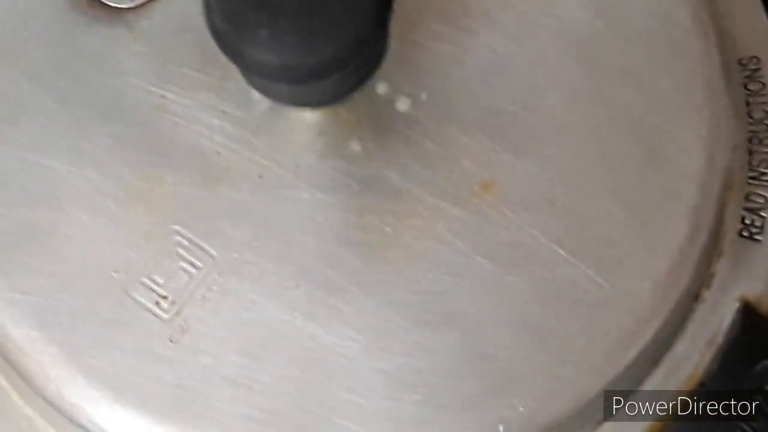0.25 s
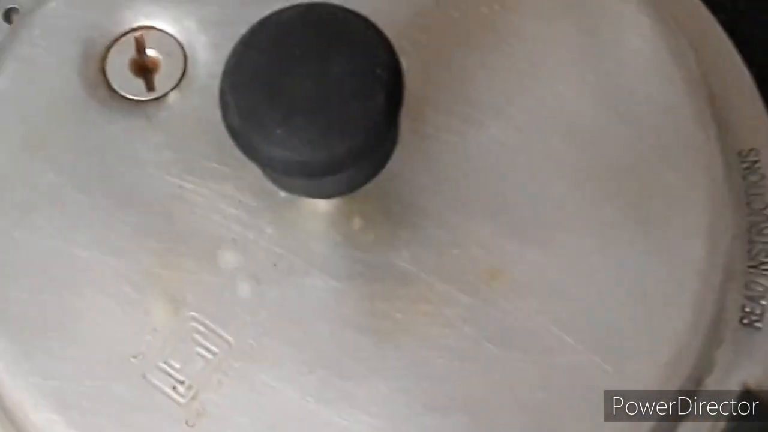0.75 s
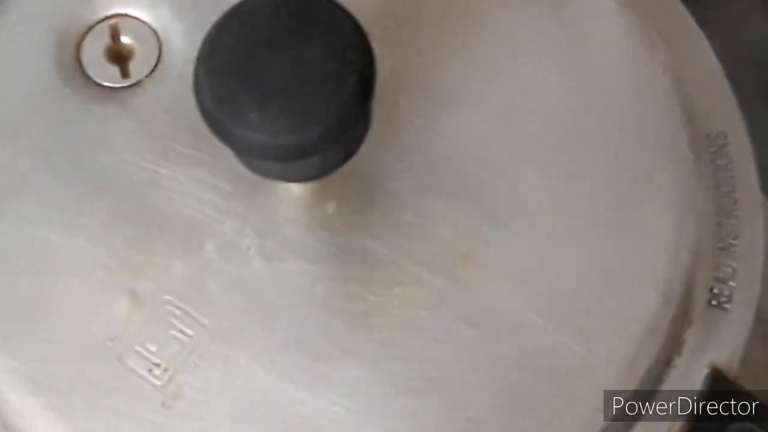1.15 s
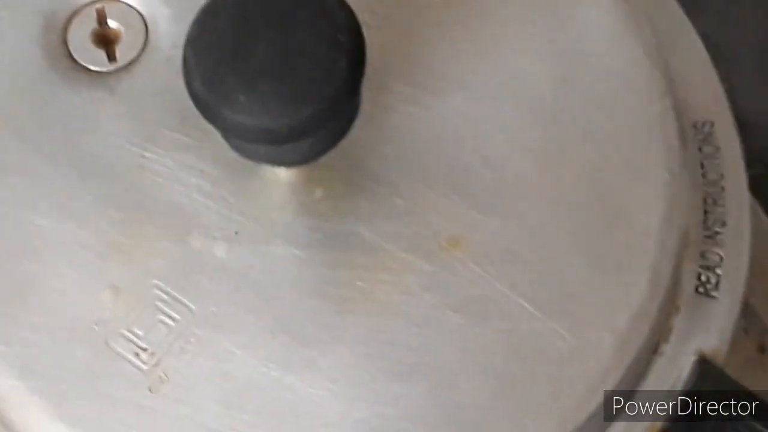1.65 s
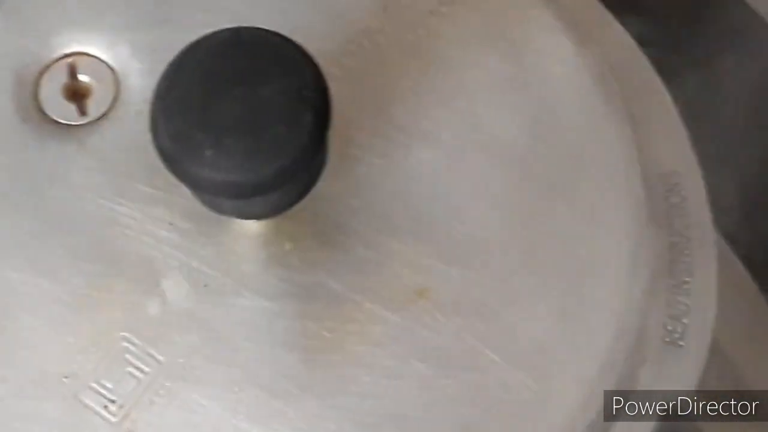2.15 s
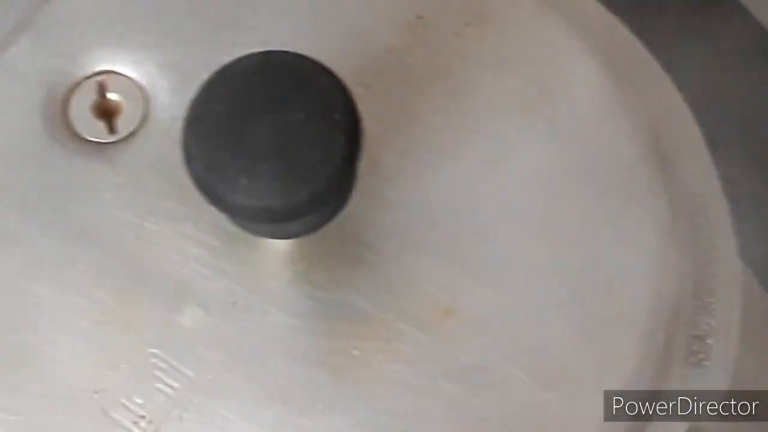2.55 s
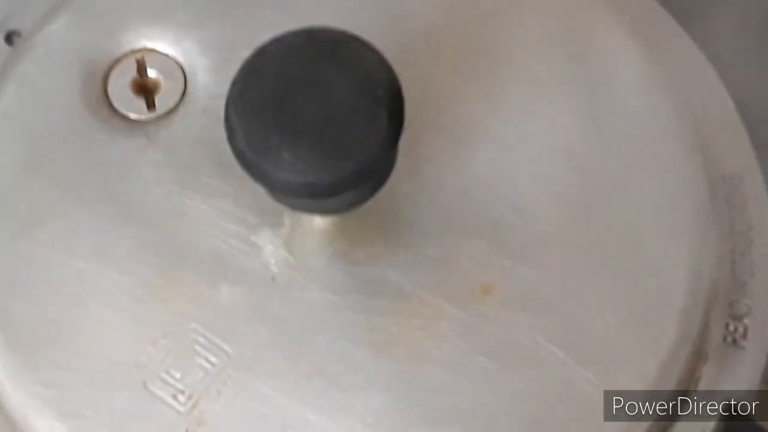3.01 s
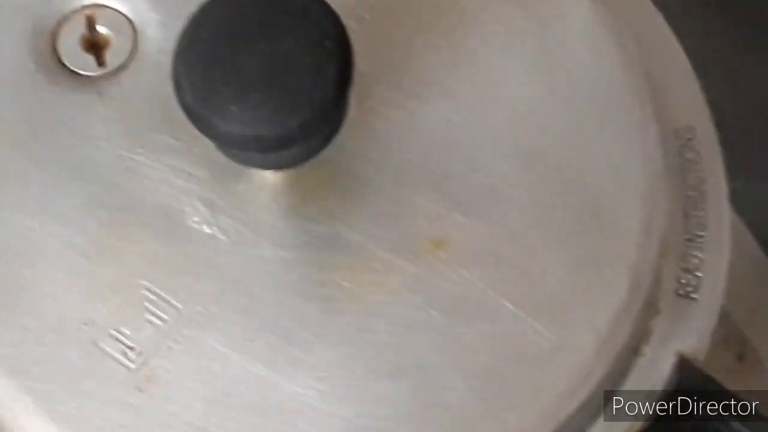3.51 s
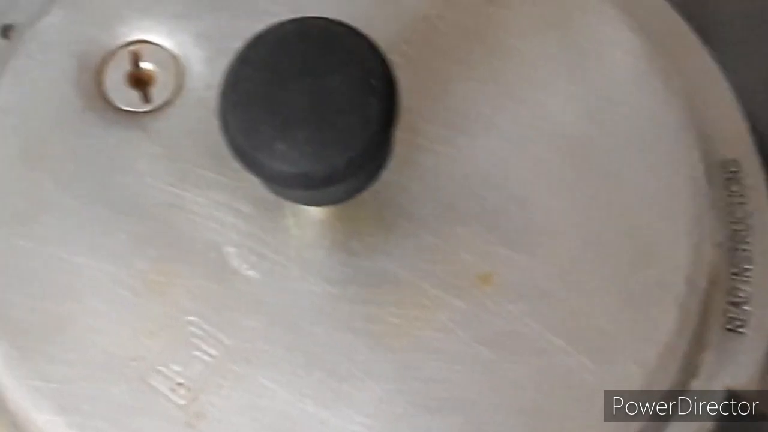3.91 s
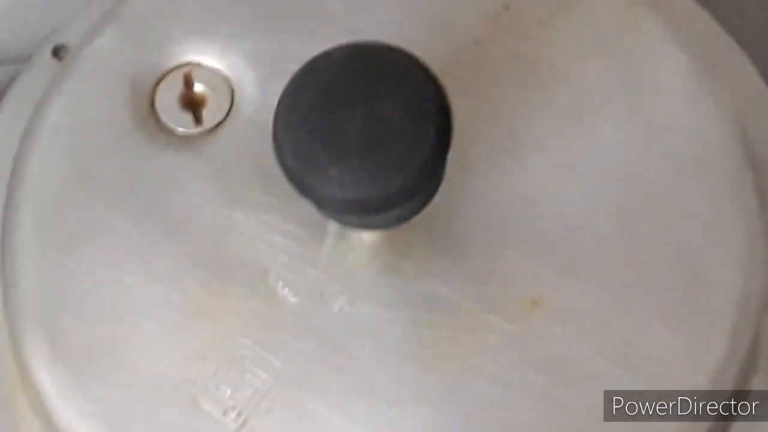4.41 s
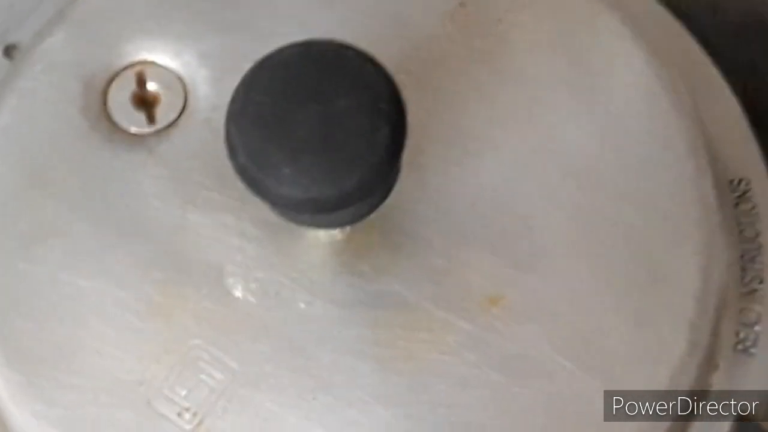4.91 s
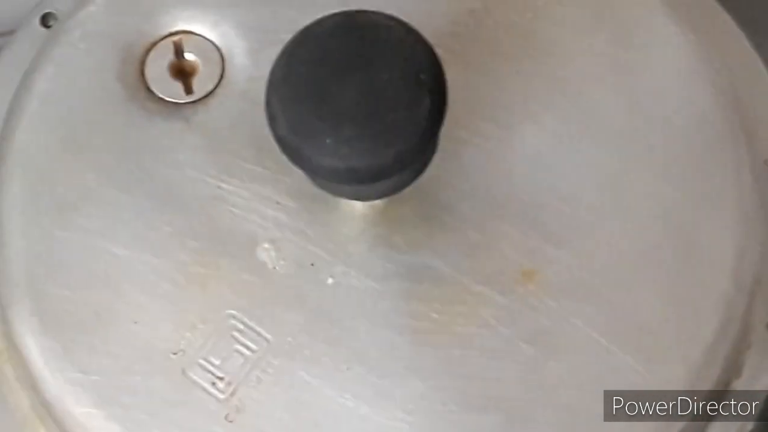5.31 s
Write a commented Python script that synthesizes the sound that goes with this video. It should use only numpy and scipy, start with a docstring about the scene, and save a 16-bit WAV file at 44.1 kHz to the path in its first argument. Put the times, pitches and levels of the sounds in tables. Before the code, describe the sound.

A pressure cooker leaks faintly, clanks, then releases a loud, steady hiss of steam with two brief wet sputters.

```python
"""A faint hiss leaks from a pressure cooker, heard from just above its lid in a kitchen.
The weight valve lifts with a clank, and the jet roars through the resonances of valve and lid,
brightest in its first wet burst. Water sputters in the vent twice, and the jet's level dips briefly
during the second sputter. Dull knocks sound under the jet, and a low hum fills the room."""
import sys
import numpy as np
from scipy import signal
from scipy.fft import rfft, irfft, next_fast_len
from scipy.io import wavfile
from scipy.ndimage import uniform_filter1d, minimum_filter1d

SR = 44100
rng = np.random.default_rng(int(sys.argv[2]) if len(sys.argv) > 2 else 0)


def digitize_waveform(pressure):
    """Quantize a signal to 16-bit integers and store it at the path in sys.argv[1].

    Rows of a 2-D input are taken as channels; values are limited to [-1, 1].
    """
    field = np.atleast_2d(pressure).T
    bounded = np.clip(field, -1, 1)
    quanta = np.round(bounded * 32767).astype(np.int16)
    wavfile.write(sys.argv[1], SR, quanta)


N = 245195
FFT_SIZE = next_fast_len(N, True)
TIME = np.arange(N) / SR
BIN_HZ = np.maximum(np.arange(FFT_SIZE // 2 + 1) * SR / FFT_SIZE, 1)
TOP_HZ = 15500


def undb(db):
    """Decibels to gain."""
    return 10 ** (np.asarray(db) / 20)


def unit_rms(x):
    """The signal scaled to an rms of 1."""
    return x / np.sqrt(np.mean(x ** 2))


def colour(points):
    """EQ curve: gain per bin from (Hz, dB) points joined on a log axis."""
    hz, db = np.transpose(points)
    return undb(np.interp(np.log(BIN_HZ), np.log(hz), db))


def lowpass(hz, order):
    """Low-pass gain per bin."""
    return 1 / np.sqrt(1 + (BIN_HZ / hz) ** (2 * order))


def noise(gain):
    """Noise of rms 1, shaped by a gain per bin."""
    return unit_rms(irfft(rfft(rng.standard_normal(FFT_SIZE)) * gain, FFT_SIZE)[:N])


def band_noise(hz, width_hz):
    """A breathy band of noise around one pitch."""
    return noise(1 / (1 + ((BIN_HZ - hz) / width_hz) ** 2) ** 2)


def wobble(per_s):
    """Smooth random modulation of rms 1."""
    hold = max(int(SR / per_s), 1)
    steps = np.repeat(rng.standard_normal(N)[:N // hold + 1], hold)
    return unit_rms(uniform_filter1d(uniform_filter1d(steps, hold), hold)[:N])


def swell(start, attack, t60):
    """Envelope with a linear attack and an exponential tail."""
    age = TIME - start
    return np.clip(age / attack, 0, 1) * np.exp(-np.log(1000) * np.maximum(age - attack, 0) / t60)


def reflections(share, t60):
    """Echoes from worktop and walls ripple the spectrum of a steady sound: gain per bin."""
    echo = rng.standard_normal(N) * swell(0, 0.0015, t60)
    return np.abs(1 + share * rfft(echo, FFT_SIZE) / np.sqrt(np.sum(echo ** 2)))


def drifting_noise(gain, echo_share, t60, places=6):
    """Noise whose echo ripple shifts slowly as the listening point sways."""
    position, out = np.linspace(0, places - 1, N), 0
    for place in range(places):
        crossfade = np.sqrt(np.maximum(1 - np.abs(position - place), 0))
        out = out + noise(gain * reflections(echo_share, t60)) * crossfade
    return out


# The colour of the room tone. Each row: frequency in Hz, gain in dB.
ROOM_EQ = [(20, -22), (60, -12), (85, -5), (120, 2.5), (220, -7), (400, 0.5), (540, 9.5), (750, 6),
           (1500, 6), (4000, -25)]

def kitchen(air_db=-52, hum_hz=85, hum_db=-70):
    """A bed of soft room tone and a low, wavering hum."""
    hum = np.sin(2 * np.pi * hum_hz * TIME) * undb(hum_db + 2.2 * wobble(5.1))
    return noise(colour(ROOM_EQ)) * undb(air_db + 1.1 * wobble(2)) + hum


# The ring after each knock: a low boom that builds slowly, and higher metallic tones.
# Each row: pitch in Hz, relative level in dB, t60 in seconds.
KNOCK_MODES = [(85.3, -16, 0.62), (263, -5, 0.65), (348, -3.5, 0.64), (454, -7, .4), (550, -8.5, .3),
               (695, -4, 0.13), (991, -19, .24), (1520, -3, 0.27), (1771, -8, .24), (2030, 4, 0.2),
               (3230, 13.5, 0.12)]
# The colour of the rattle around each knock. Each row: frequency in Hz, gain in dB.
RATTLE_EQ = [(40, -36), (100, -6), (180, -8), (300, -5), (650, 0.5), (1100, -13), (2000, 1), (3500, -2),
             (7000, -22), (14000, -35.5)]
# The opening clank, then the dull knocks.
# Each row: start in seconds, gain in dB, treble cut-off in Hz, favoured frequency in Hz.
KNOCK_HITS = [(0.202, -29.5, 4500, 2035), (1.575, -39.5, 600, 256), (2.178, -38, 700, 347),
              (3.381, -50, 900, 540), (3.62, -44, 500, 90), (3.931, -46, 590, 314), (4.76, -39, 500, 347),
              (4.995, -51, 800, 540)]

def knocks(ring_db=-10.5, favour_db=8, attack_cycles=7, rattle_db=-3, rattle_t60=1.0):
    """Each knock booms and rings over a noisy rattle; the knocks after the opening clank are softer and duller."""
    # low modes take longer to build up
    modes = np.array([undb(db) * np.sin(2 * np.pi * hz * TIME) * swell(0, attack_cycles / hz, t60)
                      for hz, db, t60 in KNOCK_MODES])
    mode_hz, out = np.array(KNOCK_MODES)[:, 0], 0
    for start, db, cutoff_hz, favoured_hz in KNOCK_HITS:
        # each blow favours the modes near one frequency
        nearness = np.exp(-(np.log(mode_hz / favoured_hz) / 0.4) ** 2)
        ring = undb(ring_db + favour_db * nearness) @ modes
        rattle = undb(rattle_db) * noise(colour(RATTLE_EQ)) * swell(0, 0.0028, rattle_t60)
        hit = signal.sosfilt(signal.butter(2, cutoff_hz, fs=SR, output="sos"), ring + rattle)
        out = out + undb(db) * np.pad(hit, (int(start * SR), 0))[:N]
    return out


# The throaty colour of a sputter. Each row: frequency in Hz, gain in dB.
SPUTTER_EQ = [(40, -30), (90, -21), (200, -25.5), (400, -8), (600, -11), (830, 1.5), (1020, -3), (1220, -7),
              (1700, 0.5), (2600, -19), (6000, -30)]
# The wet gushes. Each row: start in seconds, level in dB, attack in seconds, t60 in seconds.
GUSHES = [(0.315, -32.5, 0.009, .5), (0.345, -24.5, 0.014, 0.64), (2.489, -27, 0.011, 0.52),
          (2.535, -38, 0.011, 0.18)]

def sputters():
    """Water caught in the vent breaks the jet into short, lower gushes."""
    envelope = sum(undb(db) * swell(start, attack, t60) for start, db, attack, t60 in GUSHES)
    return noise(colour(SPUTTER_EQ)) * envelope


# Breathy whistles. Each row: start and end in seconds, pitch and width in Hz, dB against the roar.
GAP_WHISTLES = [(-0.2, 0.4, 5900, 640, -7), (-0.4, 1.0, 11100, 450, -19), (0.278, 0.38, 4500, 90, -5),
                (0.546, 0.74, 4440, 100, -4.5), (1.85, 2.302, 4420, 170, -14), (2.1, 2.61, 10500, 500, -19),
                (4.15, 4.42, 3682, 21, -12)]

def whistles():
    """Narrow resonances of the steam gap, each swelling and fading once as the weight shifts."""
    out = 0
    for start, end, hz, width_hz, db in GAP_WHISTLES:
        progress = np.clip((TIME - start) / (end - start), 0, 1)
        arch = np.sqrt(np.abs(np.sin(np.pi * progress)))
        out = out + undb(db) * arch * band_noise(hz, width_hz)
    return out


def sizzle(hz=14000, width_hz=1500, db=-18):
    """The thinnest edge of the steam gap sings in an airy band at the very top."""
    return undb(db) * band_noise(hz, width_hz)


# A leak until the weight lifts, then a nearly even jet. Each row: time in seconds, roar level in dB.
FLOW_FADER = [(0.04, -37.0), (0.16, -42.0), (0.28, -27.5), (0.335, -13.5), (1.15, -13.5), (1.77, -15.0),
              (1.87, -14), (2.2, -13.5), (2.4, -14), (3.4, -14), (3.62, -13), (3.8, -13.5), (4.8, -13.5),
              (5.1, -14.5), (5.55, -14.0)]

def flow_db(rock_per_s=9, rock_db=0.28, dip_s=2.54, dip_width_s=0.035, dip_db=-2.5):
    """The jet's level sways with the rocking weight and dips briefly during the second sputter."""
    rocking = rock_db * wobble(rock_per_s)
    dip = dip_db * np.exp(-((TIME - dip_s) / dip_width_s) ** 2)
    return np.interp(TIME, *np.transpose(FLOW_FADER)) + rocking + dip


# The broad colour of the jet. Each row: frequency in Hz, gain in dB.
JET_EQ = [(60, -54), (250, -39), (700, -30.5), (950, -21), (1300, -19.5), (2000, -9), (2200, -5.5),
          (3700, -4), (4700, 0.5), (5400, -5), (6400, -11.5), (9400, -17), (11000, -13), (14200, -12.5)]
# Peaks and notches of valve and lid. Each row: centre in Hz, width in Hz, boost or cut in dB.
LID_RESONANCES = [(1179, 48, -5.8), (1628, 16, 6.3), (1901, 18, -6.4), (2069, 52, -6.6), (2136, 98, 7.1),
                  (2318, 27, 4.4), (2448, 39, 6.2), (2528, 28, 7.8), (2603, 16, -6.8), (2686, 21, 10.4),
                  (2891, 25, 7.1), (2982, 48, 8.3), (3123, 33, 6.1), (3194, 47, 8.1), (3295, 74, 9.0),
                  (3433, 120, 5.2), (3602, 82, 6.7), (3686, 52, 10.5), (3760, 24, 7.0), (3826, 96, 5.9),
                  (3888, 23, 6.6), (4038, 154, 4.3), (4150, 27, 3.5), (4247, 26, 4.4), (4349, 19, 3.2),
                  (4406, 43, 7.7), (4554, 36, 4.1), (4732, 16, 5.8), (4889, 24, 3.7), (5417, 61, 4.3)]
# The rush over the rim of the weight. Each row: time in seconds, level in dB against the roar.
RIM_FADER = [(0, 0.0), (0.35, -1.5), (0.7, -1.0), (1.2, -2), (1.85, -2), (2.1, 0.0), (2.45, -3.0),
             (3.5, -3), (4.05, -1.5), (4.8, -5), (5.55, -4.5)]

def steam(under_hz=2050, rim_hz=4100, spray_hz=6700, tremble_db=0.27, flicker_db=0.62):
    """Turbulence in four bands (underside, roar, rim rush, spray) sounds through valve and lid."""
    # the lifting weight frees a wet burst, with more spray and less underside, that soon dries out
    burst = swell(start=0.3, attack=0.045, t60=3.8)
    under_db = -14 - 3 * burst
    spray_db = -10 + 4.5 * burst
    rim_db = np.interp(TIME, *np.transpose(RIM_FADER))
    resonance_db = sum(db / (1 + (2 * (BIN_HZ - hz) / width) ** 2) for hz, width, db in LID_RESONANCES)
    body = colour(JET_EQ) * undb(resonance_db) * lowpass(TOP_HZ, order=40)
    # neighbouring bands cross over at equal power
    deep, low, mid = lowpass(under_hz, order=12), lowpass(rim_hz, order=12), lowpass(spray_hz, order=10)
    under = drifting_noise(body * deep, echo_share=0.76, t60=0.15) * undb(under_db)
    roar = drifting_noise(body * low * np.sqrt(1 - deep ** 2), echo_share=0.6, t60=0.33)
    rim = drifting_noise(body * mid * np.sqrt(1 - low ** 2), echo_share=0.54, t60=0.4) * undb(rim_db)
    spray = drifting_noise(body * np.sqrt(1 - mid ** 2), echo_share=0.55, t60=0.07) * undb(spray_db)
    spray *= undb(flicker_db * wobble(120))  # droplets make the spray flicker
    jet = under + roar + rim + spray + whistles() + sizzle()
    # the weight trembles on its seat and shakes the whole jet
    return jet * undb(flow_db() + tremble_db * wobble(45))


def scene():
    """The jet up front, over sputters, knocks and room tone, the same in both channels."""
    mono = steam() + sputters() + knocks() + kitchen()
    return np.array([mono, mono])


def record(dry, ceiling=0.94, window_samples=65):
    """A fast limiter ducks the highest peaks, and a steep low-pass trims the very top."""
    headroom = np.minimum(1, ceiling / (np.abs(dry) + 1e-9))
    ducking = uniform_filter1d(minimum_filter1d(headroom, window_samples), window_samples)
    top_cut = signal.ellip(12, 0.1, 85, TOP_HZ, fs=SR, output="sos")
    return signal.sosfiltfilt(top_cut, dry * ducking)


dry = scene()
out = record(dry)
digitize_waveform(out)
```